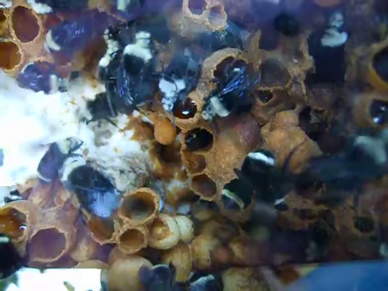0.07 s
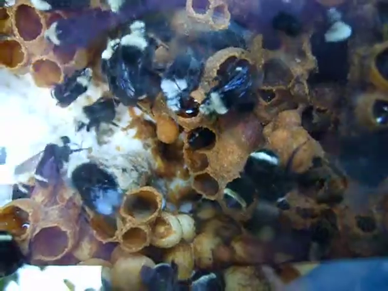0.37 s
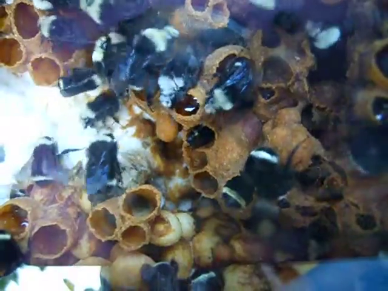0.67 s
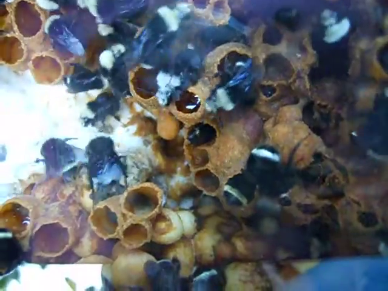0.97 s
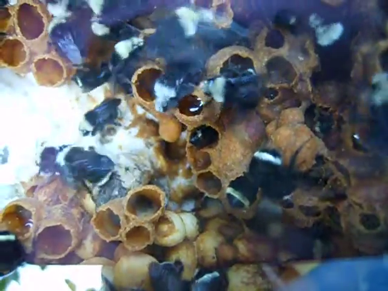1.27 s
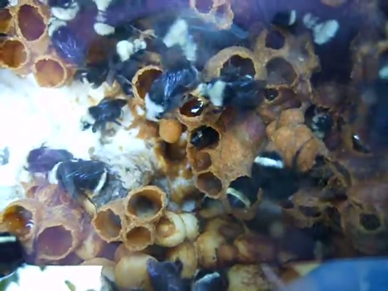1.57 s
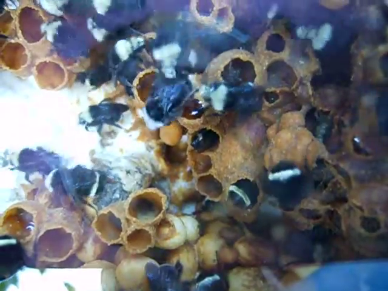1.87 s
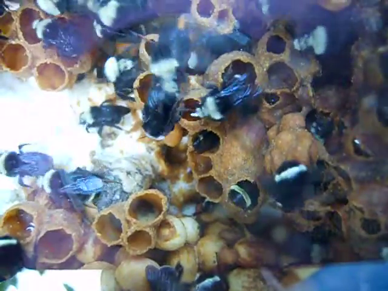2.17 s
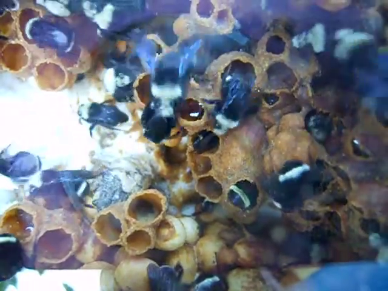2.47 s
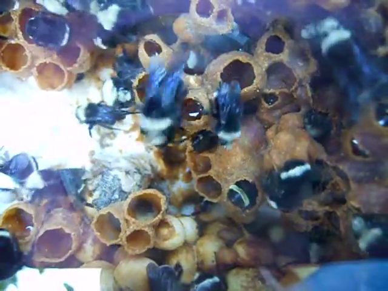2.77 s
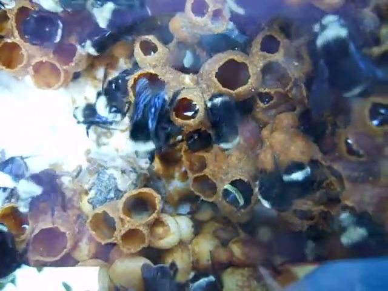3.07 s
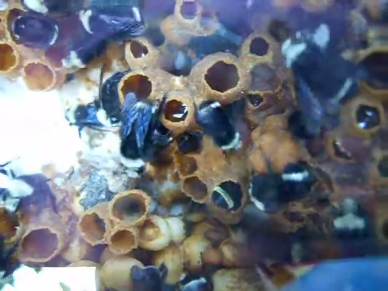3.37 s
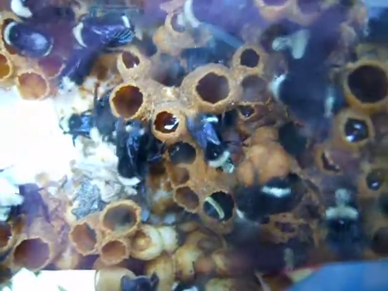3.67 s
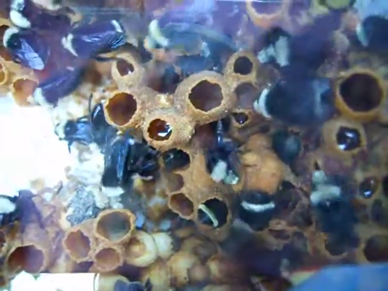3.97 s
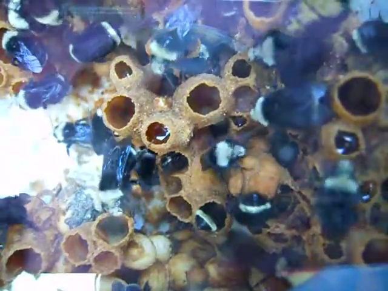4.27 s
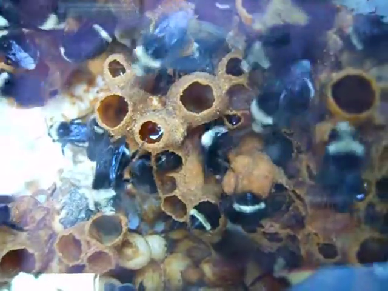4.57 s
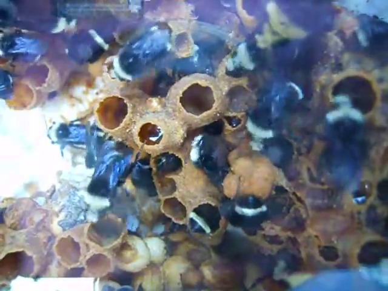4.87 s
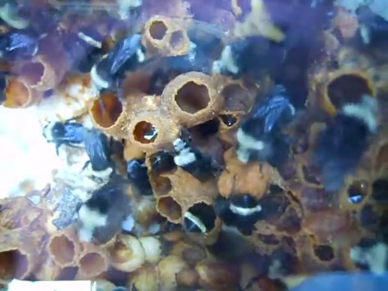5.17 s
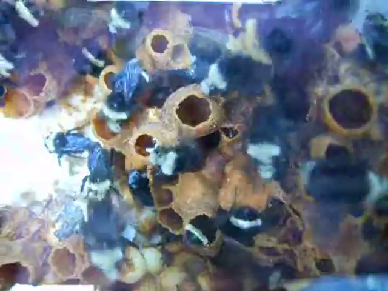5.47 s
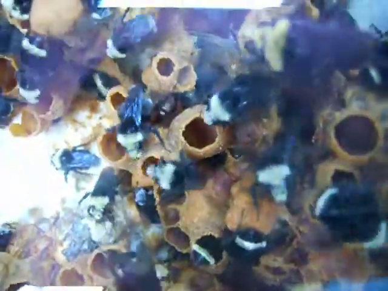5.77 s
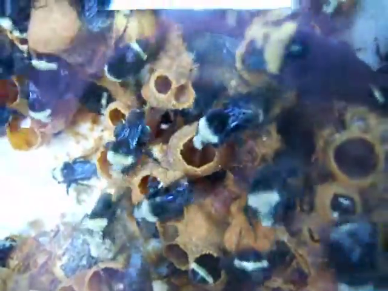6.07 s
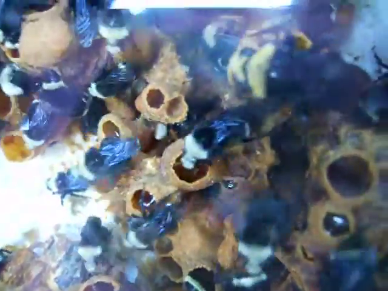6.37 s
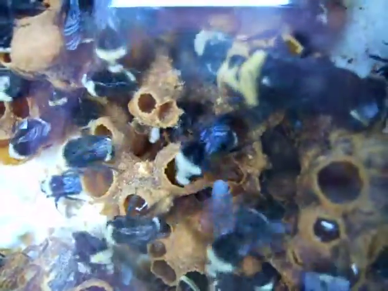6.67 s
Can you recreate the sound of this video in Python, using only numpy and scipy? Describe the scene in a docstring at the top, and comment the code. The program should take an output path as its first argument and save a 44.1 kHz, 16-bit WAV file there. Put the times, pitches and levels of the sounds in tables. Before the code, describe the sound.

Bumblebees crawl over wax comb inside a nest box, heard through a small, hissy microphone. It starts faint, with a soft bump and a few tiny ticks. Then hiss, a machinery hum and a low, muffled wing drone swell up together and hold. Several more ticks touch the box, the last one sharpest, and the drone carries on, gently gathering and easing.

```python
"""A bumblebee colony crawls over its wax comb in a nest box, heard through a small, hissy microphone.
Muffled wingbeats drone over the hum of room machinery; now and then something ticks against the box.
The whole background starts faint and swells to a steady level within about two seconds."""
import sys
import numpy as np
from scipy import signal
from scipy.fft import rfft, irfft, next_fast_len
from scipy.io import wavfile
from scipy.ndimage import uniform_filter1d

SR = 44100
rng = np.random.default_rng(int(sys.argv[2]) if len(sys.argv) > 2 else 0)


def bounce(signal):
    """Save signal as a 16-bit WAV file at the path given by the first command-line argument."""
    frames = np.transpose(np.atleast_2d(signal))
    limited = np.clip(frames, -1, 1)
    pcm = np.round(limited * 32767).astype(np.int16)
    wavfile.write(sys.argv[1], SR, pcm)


N = 300762

# colour of the rumble: (Hz, dB per Hz)
RUMBLE_COLOUR = [(8, -13.5), (16, -4), (30, -9), (45, -5.5), (60, -14.5), (90, -21.5), (200, -59)]
# room air and microphone hiss: (Hz, dB per Hz)
HISS = [(30, -5.5), (60, 1), (100, 6.5), (170, 2), (230, -1.5), (320, -0.44), (540, -0.5), (820, -3.5), (1100, -5.5), (1700, -7), (2700, -9), (4300, -11), (7400, -13)]
# steady hum and whine of machinery: (Hz, rms dB)
HUM = [(58.7, -51), (78.8, -60.5), (88.7, -59.5), (119, -51.5), (151.5, -54.5), (997.6, -59.3), (1020.5, -69), (728, -64.5)]   # fixed
# narrow resonances in the air noise: (Hz, width Hz, rms dB)
AIR_MODES = [(509, 22, -59), (710, 16, -58.5), (2330, 130, -64)]
# ticks against the box; the harder the contact, the higher the band it wakes: (s, peak dB, lower edge Hz, upper edge Hz)
TICKS = [(0.1611, -43, 500, 7000), (0.2399, -27, 1730, 5100), (0.4993, -40, 1500, 4800), (0.5052, -39, 2400, 8200),
         (2.025, -26.5, 1300, 2900), (2.031, -28, 1290, 2600), (2.325, -29, 735, 1250), (2.7057, -25, 1200, 2700),
         (2.886, -32, 895, 2800), (3.3081, -12.5, 4030, 8600)]
# what the box rings with: (Hz, dB, t60 s)
BOX_MODES = [(520, -11.5, 0.03), (950, -4, 0.0068), (1560, -5.5, 0.011), (2440, -2, 0.0068), (3300, -1.5, 0.0036), (4400, 2.5, 0.0014), (5860, 1, 0.0017), (7550, 0.5, 0.0014)]
# a soft bump of the box: (s, peak dB), and its low modes: (Hz, dB, t60 s)
BUMP = (.1598, -40.5)
BUMP_MODES = [(186, -9.5, 0.32), (304, 0.5, 0.024), (534, 0, .022), (770, -3, 0.013)]
HISS_DB = -39
# treble roll-off of the microphone: (Hz, dB)
MIC = [(20, 0), (7300, 0), (7650, -3.5), (8000, -19), (8330, -16.5), (8600, -20), (8900, -30)]   # fixed
CUTOFF_HZ = 9039   # fixed
TIME = np.arange(N) / SR
START_S = .038   # fixed
# the swell: its start, its time constant, and the level before it
SWELL_S, SWELL_TIME_S, FAINT_DB = .76, 0.93, -23
BASS_SWELL_TIME_S, BASS_FAINT_DB = 1.0, -21
# the lid of the box throws every tick back, upside down
LID_ECHO_S, LID_ECHO_DB = .00078, -7   # fixed
# the colony's drone gathers and eases off: (s, dB about its usual level)
ACTIVITY = [(0.3, 1.5), (0.65, -3.5), (1.5, 2), (2.05, -1.0), (2.7, 1), (3.0, -4.4), (3.2, 1.5), (3.8, 2),
            (4.5, 3), (5.15, -6), (5.75, 2.5), (6.0, -3), (6.3, 2), (6.8, -0.9)]
# levels once the background has swelled (rms dB)
DRONE_DB, RUMBLE_DB = -44.5, -48
# the rumble heaves once: (s at its top, width s, dB over its usual level)
HEAVE = (4.78, .2, 5)


def from_db(db):
    """Decibels to gain."""
    return 10 ** (np.asarray(db) / 20)


def rms_one(x):
    """Scale to unit power."""
    return x / np.sqrt(np.mean(x ** 2) + 1e-20)


def level(rows):
    """Gain at every sample from rows of (s, dB)."""
    return from_db(np.interp(TIME, *np.transpose(rows)))


def coloured(x, spectrum):
    """Filter by a table of (Hz, dB) on a log-frequency axis."""
    hz, db = np.transpose(spectrum)
    size = next_fast_len(N)
    bins = np.maximum(np.fft.rfftfreq(size, 1 / SR), 1)
    return irfft(rfft(x, size) * from_db(np.interp(np.log(bins), np.log(hz), db)), size)[:N]


def drift(rate):
    """Smooth chance of spread 1 that changes about `rate` times a second."""
    knots = rng.standard_normal(2048)   # fixed
    return np.interp(TIME * rate, np.arange(len(knots)), knots)


def evened(x, span_s):
    """Hold the power at 1 over stretches of span_s, keeping the faster beating."""
    return x / np.sqrt(uniform_filter1d(x ** 2, max(int(span_s * SR), 1)) + 1e-12)


def ring(force, hz, t60):
    """One mode: a unit click leaves a decaying cosine of height 1."""
    r, w = from_db(-60 / (t60 * SR)), 2 * np.pi * hz / SR   # fixed
    return signal.lfilter([1, 0, -1], [2, -4 * r * np.cos(w), 2 * r * r], force + 1e-18)


def struck(modes):
    """A quarter second of a body's answer to one click; neighbouring modes swing in opposite directions."""
    click = signal.unit_impulse(SR // 4)   # fixed
    return sum((-1) ** k * from_db(db) * ring(click, hz, t60) for k, (hz, db, t60) in enumerate(modes))


def add(out, s, peak_db, sound):
    """Mix a short sound in at time s with the given peak."""
    at = int(s * SR)
    out[at:at + len(sound)] += from_db(peak_db) * sound[:N - at] / np.abs(sound).max()


def wings(low_hz=111, high_hz=145, wander=0.03037, small_db=-2, octave_db=-24, effort_db=2, count=9):
    """Large bees beat slowly and loudly, small ones faster; the comb muffles all but the fundamental."""
    out = np.zeros(N)
    for hz, db in zip(np.linspace(low_hz, high_hz, count), np.linspace(0, small_db, count)):
        phase = 2 * np.pi * (np.cumsum(hz * (1 + wander * drift(14))) / SR + rng.random())
        effort = from_db(db + effort_db * drift(7))
        out += effort * (np.sin(phase) + from_db(octave_db) * np.sin(2 * phase))
    return from_db(DRONE_DB) * level(ACTIVITY) * evened(out, span_s=.25)


def machinery(waver_hz=0.15):
    """Motors and mains give thin, nearly steady lines."""
    out = np.zeros(N)
    for hz, db in HUM:
        phase = 2 * np.pi * (np.cumsum(hz + waver_hz * drift(3.005)) / SR + rng.random())
        out += from_db(db + 0.57 * drift(2.3)) * np.sqrt(2) * np.sin(phase)
    return out


def air():
    """Smooth hiss with a few narrow resonances standing out of it."""
    out = from_db(HISS_DB) * rms_one(coloured(rng.standard_normal(N), HISS))
    for hz, width_hz, db in AIR_MODES:
        out += from_db(db) * rms_one(ring(rng.standard_normal(N), hz, np.log(1000) / (np.pi * width_hz)))
    return out


def rumble():
    """Lumpy low noise of the room, with one broad heave."""
    s, width_s, db = HEAVE
    heave = from_db(db * np.exp(-((TIME - s) / width_s) ** 2))
    return from_db(RUMBLE_DB) * heave * evened(coloured(rng.standard_normal(N), RUMBLE_COLOUR), span_s=0.25)


def ticks(crack_db=-20):
    """Hard, tiny contacts wake the high modes of the box, softer ones the low modes; a little reaches them all."""
    out, box = np.zeros(N), struck(BOX_MODES)
    box = box - from_db(LID_ECHO_DB) * np.roll(box, round(LID_ECHO_S * SR))
    for s, peak_db, low_hz, high_hz in TICKS:
        contact = signal.butter(2, [low_hz, max(high_hz, low_hz + 100)], "band", fs=SR, output="sos")
        add(out, s, peak_db, signal.sosfilt(contact, box) - from_db(crack_db) * box)
    add(out, *BUMP, struck(BUMP_MODES))
    return out


def swell(faint_db, time_s):
    """Gain that stays faint at first, then closes in on 1 exponentially."""
    return 1 - (1 - from_db(faint_db)) * np.exp(-np.maximum(TIME - SWELL_S, 0) / time_s)


def scene():
    """The whole background swells together, the bass at a pace of its own; the ticks stand apart from it."""
    bass = swell(BASS_FAINT_DB, BASS_SWELL_TIME_S) * (wings() + rumble())
    nest = swell(FAINT_DB, SWELL_TIME_S) * (air() + machinery()) + bass + ticks()
    return nest[None]


def record(dry):
    """The microphone opens after a moment of silence and passes little above 8 kHz."""
    heard = coloured(dry[0] * (TIME >= START_S), MIC)
    return signal.sosfilt(signal.ellip(12, .1, 90, CUTOFF_HZ, fs=SR, output="sos"), heard)[None]


dry = scene()
out = record(dry)
bounce(out)
```